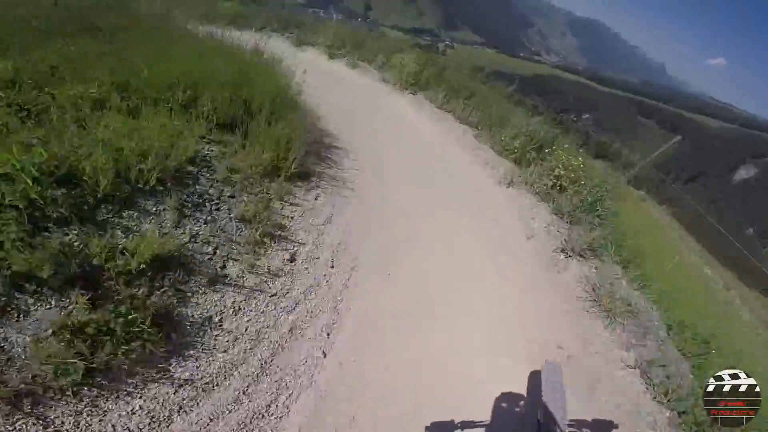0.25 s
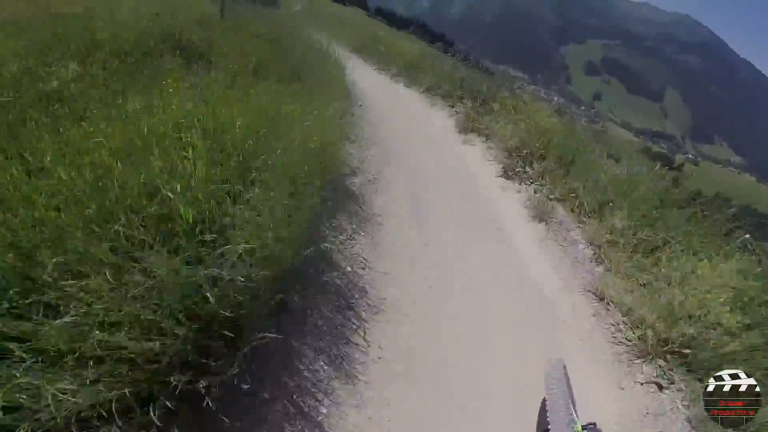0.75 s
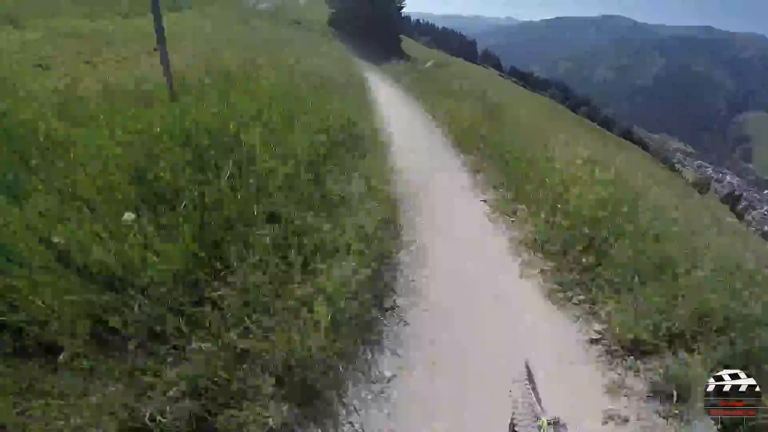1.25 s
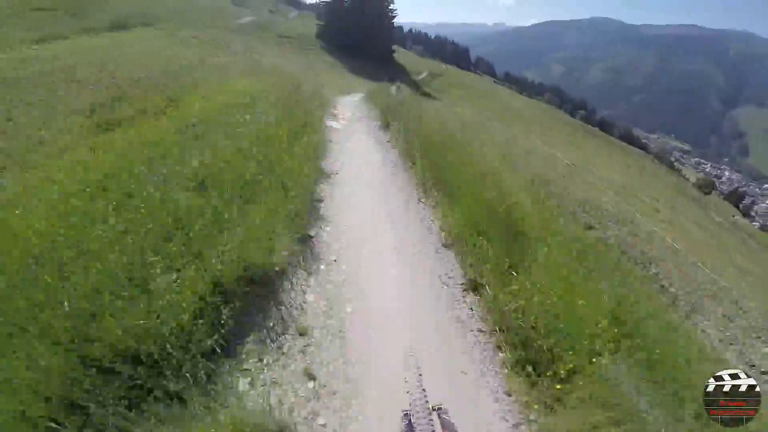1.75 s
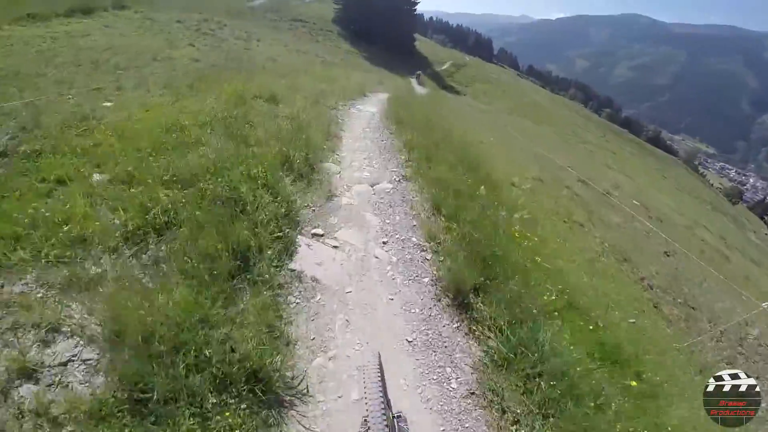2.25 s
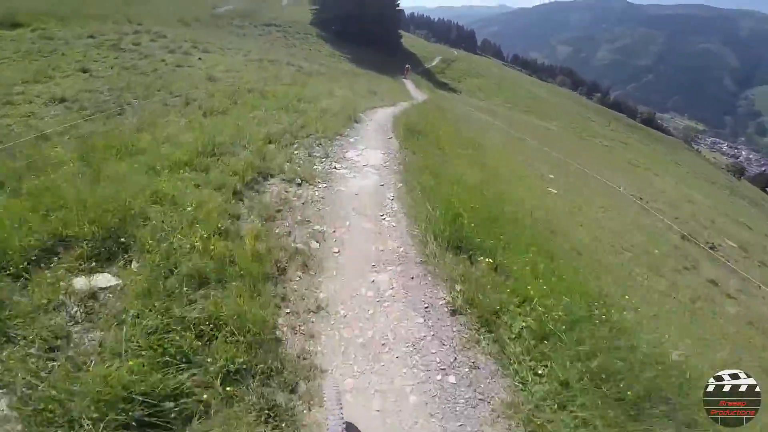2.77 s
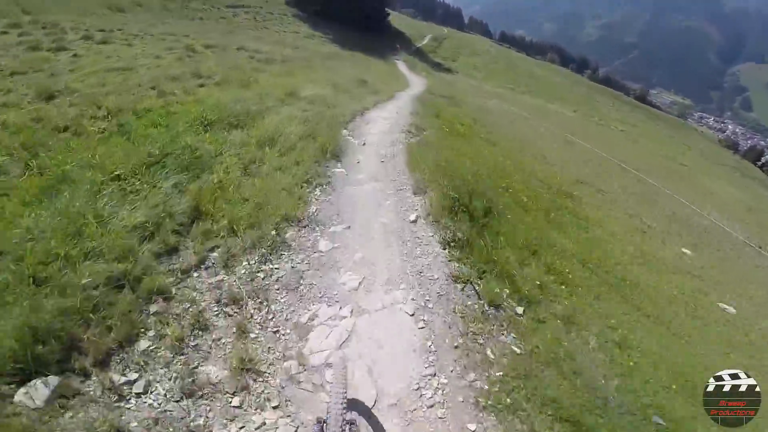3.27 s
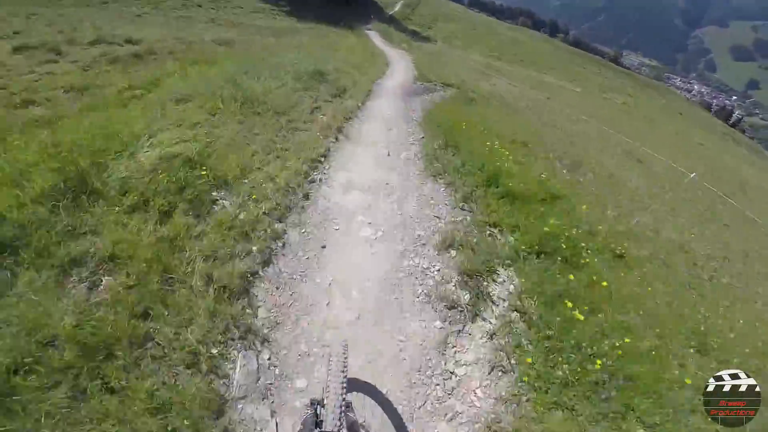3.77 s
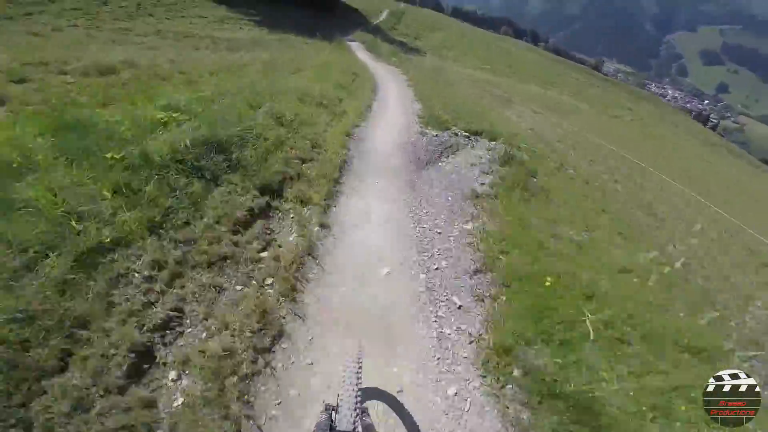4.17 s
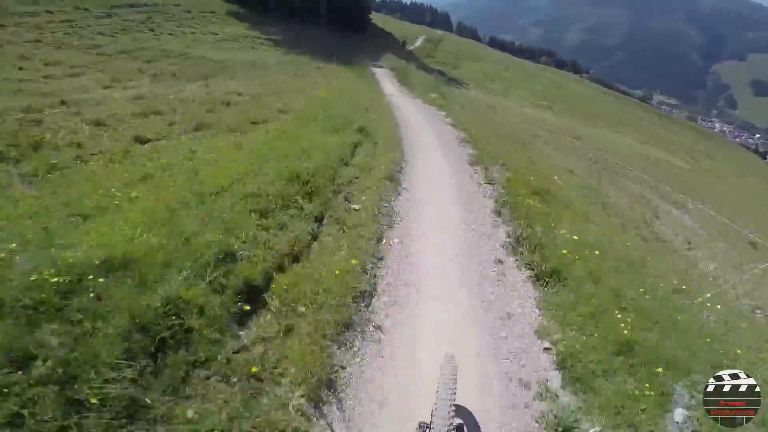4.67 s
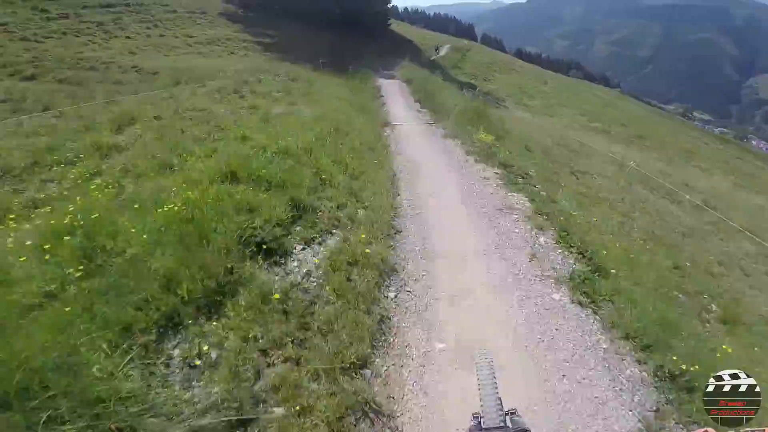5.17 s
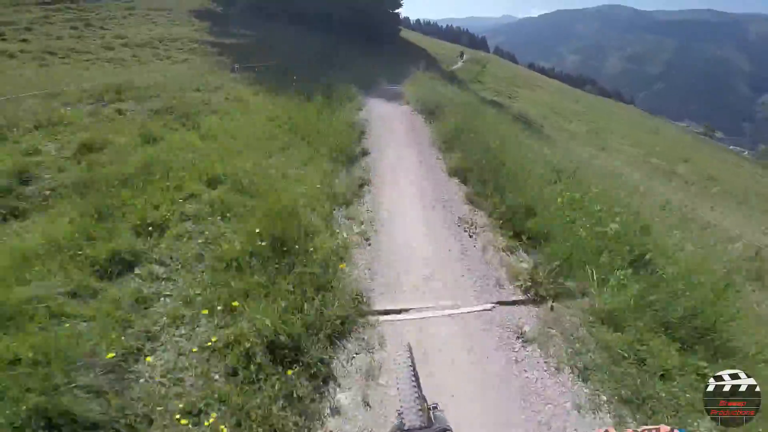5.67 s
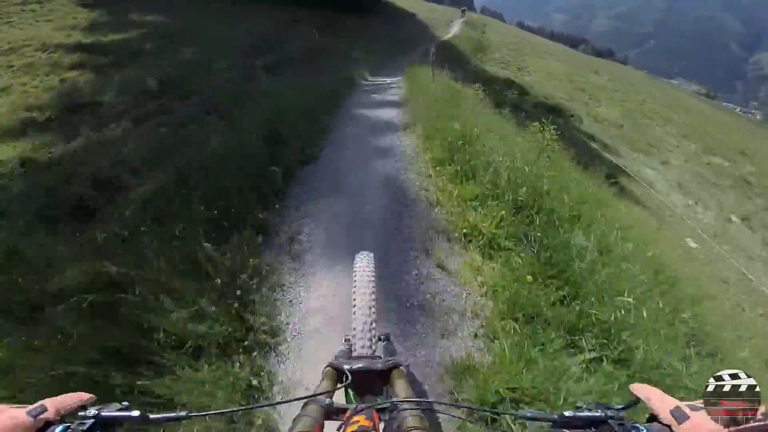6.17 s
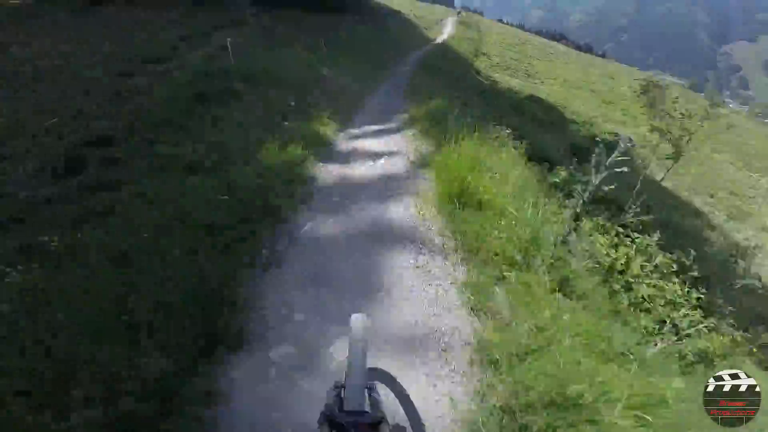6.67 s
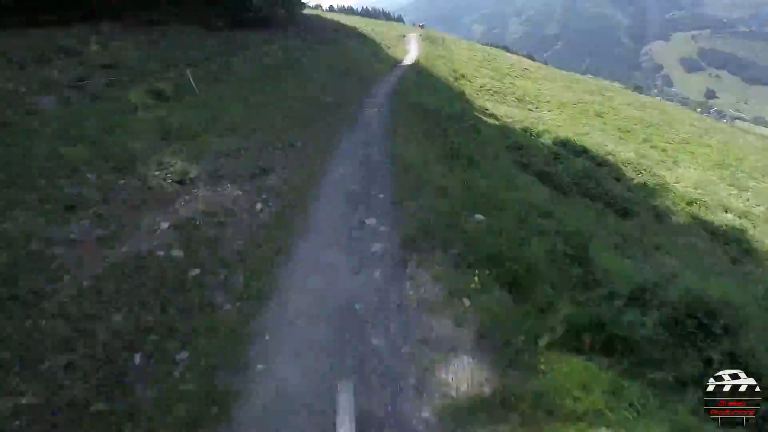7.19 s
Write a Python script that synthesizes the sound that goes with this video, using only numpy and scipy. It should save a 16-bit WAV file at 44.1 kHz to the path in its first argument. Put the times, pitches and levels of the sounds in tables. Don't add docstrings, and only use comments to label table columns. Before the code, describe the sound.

A coasting bike descends an open gravel hillside trail, heard through overloading wind on a close mono microphone. Deep uneven buffets come first, with rougher roaring gusts around one second, then a steadier low rumble and scattered bursts later. Beneath are faint crunching tyres, fast high freewheel ticks, sharp stone knocks, rattling chain slaps and barely audible brake disc chirps. There is no echo from the open slope.

```python
import sys
import numpy as np
from scipy import signal
from scipy.fft import rfft, irfft
from scipy.io import wavfile
from scipy.ndimage import uniform_filter1d

SR = 44100
rng = np.random.default_rng(int(sys.argv[2]) if len(sys.argv) > 2 else 0)


def volts_from_decibels(level):
    exponent = np.asarray(level, float) / 20
    return 10 ** exponent


def wrap_up_sound(samples):
    columns = np.atleast_2d(samples).T
    tamed = np.clip(columns, -1, 1)
    steps = np.round(tamed * 32767).astype(np.int16)
    wavfile.write(sys.argv[1], SR, steps)


N = 327645

# time in seconds, then the levels in dB of buffeting, flap, gust roar
WIND_LEVELS = [(0.0, -27.5, -44, -37, -45), (0.1, -34, -36, -54, -49), (0.16, -20, -25.5, -33, -55.5),
               (0.41, -17, -18, -21.5, -38.5), (0.48, -22, -29.5, -48.5, -48.5),
               (0.78, -17.5, -26, -28.5, -46), (1.14, -14, -22, -16.5, -24),
               (1.26, -20.5, -24.5, -35.5, -49), (1.3, -12, -28, -15.5, -27.5),
               (1.43, -21, -28, -36, -47.5), (1.66, -14.5, -26, -28.5, -45),
               (1.82, -29.5, -32.5, -50.5, -49), (2.19, -21.5, -33, -45.5, -62),
               (2.32, -29, -23.5, -19.5, -35.5), (2.38, -18, -29.5, -42.5, -51.5),
               (3.81, -20.5, -33.5, -41.5, -45), (3.91, -15.5, -14.5, -31.5, -51),
               (3.99, -18.5, -34, -42, -50), (4.26, -18, -27, -26, -46), (4.88, -15.5, -28, -39.5, -44.5),
               (5.05, -22, -35.5, -42, -48), (5.32, -13, -21, -31, -40.5), (5.63, -21.5, -32, -44.5, -51.5),
               (5.75, -11, -39, -25.5, -36), (5.79, -17, -26.5, -34.5, -37.5),
               (6.27, -26.5, -40, -49, -53.5), (6.45, -17.5, -35.5, -48, -55.5),
               (6.66, -12.5, -16, -24, -31), (6.75, -23, -50, -46, -46), (6.93, -26.5, -34, -43, -52),
               (7.06, -12, -20, -22, -39.5), (7.12, -28, -39, -43, -44), (7.24, -14, -21.5, -32, -39.5),
               (7.43, -22.5, -33, -39.5, -44)]
# frequency in Hz, level in dB per Hz.
BUFFET_COLOUR = [(7.1, -32), (12, -3.5), (34, 0.5), (110, -14), (140, -51), (240, -120)]
FLAP_COLOUR = [(60, -16), (90, 0), (130, -1.5), (200, -9.5), (300, -19), (500, -45)]
ROAR_COLOUR = [(120, -11), (210, -2), (300, -0.5), (450, -4.5), (700, -11), (1100, -27), (2000, -46)]
TEAR_COLOUR = [(400, -33), (700, -1.5), (1000, 2.5), (1400, -3.5), (2200, -13.5), (3500, -23), (6000, -52)]
# time in seconds, peak in dB, pitch in Hz.
PRESSURE_SPIKES = [(0.152, -20.5, 195), (0.243, -20.5, 231), (0.339, -18, 202), (0.405, -13, 195),
                   (0.57, -21.5, 269), (0.69, -17.5, 180), (0.743, -17, 200), (0.793, -18.5, 183),
                   (0.881, -22, 180), (1.125, -17, 291), (1.213, -17, 405), (1.294, -8, 364),
                   (1.314, -14, 380), (2.301, -15, 264), (2.633, -22, 225), (3.818, -33, 200),
                   (3.879, -23, 179), (3.914, -20, 180), (4.03, -21.5, 203), (4.184, -18, 287),
                   (4.5, -33, 226), (4.83, -22, 181), (5.282, -36, 185), (5.698, -25, 264),
                   (5.805, -27, 241), (5.817, -21, 180), (6.14, -42, 183), (6.533, -18.5, 188),
                   (7.074, -21, 255)]
# time in seconds, peak in dB, pitch in Hz,
# length in seconds.
EDDY_CHIRPS = [(0.342, -28.5, 800, 0.01), (0.406, -16.5, 597, 0.0076), (0.806, -23, 635, 0.0061),
               (0.952, -20, 850, 0.0074), (1.025, -18, 620, 0.0071), (1.113, -28, 703, 0.0096),
               (1.288, -33, 595, 0.0065), (1.293, -12.5, 816, 0.011), (1.35, -22, 760, 0.011),
               (1.452, -28.5, 610, 0.008), (1.548, -25, 660, 0.0077), (1.646, -21, 610, 0.0074),
               (1.68, -28.5, 850, 0.0064), (2.289, -17.5, 635, 0.0083), (2.326, -25, 713, 0.0067),
               (2.34, -30, 810, 0.008), (2.44, -35.5, 770, 0.009), (3.471, -36, 850, 0.0075),
               (3.814, -42, 840, 0.0075), (4.191, -28, 884, 0.0072), (4.288, -33, 614, 0.008),
               (4.355, -36, 630, 0.0082), (4.536, -32, 600, 0.007), (4.882, -38, 660, 0.0084),
               (5.991, -35, 830, 0.0083), (6.573, -22, 725, 0.0092), (6.592, -21.5, 620, 0.0056),
               (7.044, -34, 800, 0.008), (7.2, -32, 705, 0.0059), (7.296, -28, 690, 0.0062),
               (1.15, -27.5, 1180, 0.0076), (2.639, -28, 970, 0.0073), (4.204, -26.5, 1004, 0.009),
               (5.655, -35, 1284, 0.008), (5.736, -25.5, 988, 0.0053), (5.76, -22, 1060, 0.0072),
               (5.801, -35, 1120, 0.0081), (6.538, -26.5, 915, 0.0075), (6.667, -23.5, 910, 0.009),
               (6.677, -31, 1330, 0.011), (6.975, -19.5, 1093, 0.008), (6.988, -26, 1094, 0.0071),
               (3.634, -38, 760, 0.035)]
# time in seconds, roll level in dB, fine hiss level in dB.
TYRE_LEVELS = [(0.0, -54.5, -61.5), (1.18, -49, -58), (1.61, -53, -64), (3.31, -54.5, -69),
               (3.54, -51, -63), (5.71, -50.5, -63), (6.37, -55.5, -60), (6.97, -51.5, -70),
               (7.43, -44, -60)]
# frequency in Hz, level in dB per Hz.
ROLL_COLOUR = [(290, -26), (500, 3.5), (564, -11.5), (660, -10.5), (736, -5), (904, -8), (1050, -19.5),
               (1300, -7.5), (2410, -8), (9000, -31.5), (11700, -57), (19800, -120)]
HISS_COLOUR = [(3000, -2), (5000, 3), (7000, -1.5), (9000, -3.5), (12000, -1), (14500, -5.5), (15400, -3),
               (16500, -35)]
# time in seconds, level in dB, pawl drops per second.
FREEWHEEL_RATES = [(0.0, -64, 71), (0.25, -63.5, 65), (1.34, -62, 61.6), (1.8, -78, 59), (2.65, -68, 70),
                   (2.92, -67, 69.4), (3.89, -64, 67), (4.12, -63, 85.7), (5.17, -69, 110), (6.39, -61, 89),
                   (6.68, -62, 95), (7.43, -68, 93)]
# frequency in Hz, width in Hz, level in dB.
HUB_RINGS = [(13050, 660, 4), (12300, 900, -18), (14900, 900, -15), (10400, 2400, -10), (8500, 1200, -40),
             (5400, 400, -11)]
# time in seconds, peak in dB, pitch in Hz.
STONE_KNOCKS = [(0.9053, -41, 1680), (0.9877, -30.5, 1820), (1.014, -31.5, 1980), (1.0969, -47, 1740),
                (1.111, -37, 1700), (1.1656, -26.5, 2270), (1.2855, -43, 2100), (1.2955, -28, 1730),
                (1.5424, -39, 1700), (1.6826, -39, 1660), (1.7035, -42, 2100), (1.7956, -29, 2040),
                (2.8514, -38.5, 2320), (3.277, -43, 1850), (3.3323, -33, 1910), (3.4151, -38, 2200),
                (3.469, -31.5, 1970), (3.6636, -33, 2250), (3.896, -35, 2270), (3.9539, -36.5, 1770),
                (3.9594, -39, 2220), (4.8244, -36, 1940), (4.8584, -36.5, 2220), (4.884, -33.5, 1680),
                (5.2515, -36.5, 2240), (5.3308, -35, 2100), (6.0287, -34.5, 1920), (6.5271, -31.5, 1910),
                (6.538, -22, 1850), (6.6084, -31.5, 2700), (6.6657, -36, 2290), (6.7216, -37, 1800),
                (7.2215, -32, 1930), (1.31, -29, 2760), (1.32, -40, 2980)]
# time in seconds, peak in dB, top end against the middle in dB,
# ring in Hz.
CHAIN_SLAPS = [(0.9093, -44, -10, 5330), (0.9618, -40, -4.5, 5360), (1.075, -39.5, -13, 7600),
               (1.2979, -58, -14, 5240), (1.73, -40.5, -4.5, 5740), (1.8706, -41.5, -6, 5380),
               (2.0383, -48, -8, 6180), (2.1894, -46, -14, 7000), (2.3257, -46.5, -2.5, 5340),
               (2.6953, -41, -6, 6410), (3.3323, -59, -19, 5080), (3.3613, -45.5, -20, 5260),
               (3.4291, -39.5, -7, 5250), (3.48, -38, -14, 5100), (3.5397, -38, -22, 6900),
               (3.582, -39.5, -20, 5230), (3.6127, -38, -20, 5400), (3.6561, -44, -16, 6400),
               (3.712, -47, -13, 7900), (3.7389, -41, -17, 5880), (3.81, -41, -16, 5810),
               (3.879, -40, -18, 5220), (4.0866, -44, -13, 5690), (4.1662, -36.5, -12, 5100),
               (4.2436, -42, -12, 5200), (4.314, -39.5, -15, 5150), (5.969, -43, -13, 5350),
               (6.125, -42.5, -8, 6570), (6.5231, -41, -11, 5320), (6.5445, -28, -13, 5360),
               (6.5809, -35, -5, 5650), (6.608, -35, -11, 5940), (6.8064, -43.5, -4, 5240),
               (7.084, -47, -19, 5580), (7.1691, -41, -12, 5120), (7.3352, -44.5, -6, 5380)]
# time in seconds, peak in dB, pitch in Hz.
DISC_CHIRPS = [(2.5742, -48, 4830), (3.1718, -55, 4520), (3.3324, -51, 4610), (3.4292, -49, 5050),
               (3.4801, -44, 4970), (3.536, -47, 5040), (3.5819, -47, 4710), (3.8762, -52, 5600),
               (4.0862, -51, 4620), (4.1685, -49, 5200), (4.2429, -54, 5150), (4.361, -52, 5130),
               (5.999, -44, 4860), (6.2841, -50, 4710)]


def evened(x):
    return x / np.sqrt(np.mean(x ** 2) + 1e-20)


def curve(rows, column):
    columns = np.transpose(rows)
    return np.interp(np.arange(N) / SR, columns[0], columns[column])


def add(mix, start_s, sound):
    part = mix[round(start_s * SR):][:len(sound)]
    part += sound[:len(part)]


def flutter(speed_hz):
    hz = np.fft.rfftfreq(N, 1 / SR)
    spectrum = rfft(rng.standard_normal(N))
    return evened(irfft(spectrum / (1 + (hz / speed_hz) ** 2), N))


def noise(colour, patchy_db, size):
    hz = np.fft.rfftfreq(size, 1 / SR)
    real, imaginary, patches = rng.standard_normal((N // (size // 4) + 5, len(hz), 3)).T
    patches = uniform_filter1d(patches, size=5, axis=0)
    patches = evened(uniform_filter1d(patches, size=6, axis=1))
    colour_hz, db = np.transpose(colour)
    colour_db = np.interp(np.log(hz + 1), np.log(colour_hz + 1), db, -120, -120)
    spectra = (real + 1j * imaginary) * volts_from_decibels(colour_db[:, None] + patchy_db * patches)
    return evened(signal.istft(spectra, nperseg=size, noverlap=size - size // 4)[1][:N])


def resonate(x, hz, width):
    r = np.exp(-np.pi * width / SR)
    poles = [2, -4 * r * np.cos(2 * np.pi * hz / SR), 2 * r * r]
    return signal.lfilter([1 - r * r, 0, r * r - 1], poles, x)


def burst(t60, rise):
    t = np.arange(3000) / SR
    return (1 - np.exp(-t / rise)) * volts_from_decibels(-60 * t / t60)


def wind():
    clumps, shreds = flutter(34), flutter(150)
    buffet = noise(BUFFET_COLOUR, 0.73, size=4096)
    buffet /= np.sqrt(uniform_filter1d(buffet ** 2, size=5000) + 0.067)
    buffet = evened(buffet * volts_from_decibels(1.8 * clumps))
    flap = evened(noise(FLAP_COLOUR, 0.72, size=2048) * volts_from_decibels(3.25 * clumps))
    roar = evened(noise(ROAR_COLOUR, 1.7, size=1024) * volts_from_decibels(2.43 * clumps + 1.16 * shreds))
    tear = evened(noise(TEAR_COLOUR, 2.6, size=512) * volts_from_decibels(1.36 * clumps + 2.9 * shreds))
    out = volts_from_decibels(curve(WIND_LEVELS, 1)) * buffet
    out += volts_from_decibels(curve(WIND_LEVELS, 2) - 0.9) * flap
    out += volts_from_decibels(curve(WIND_LEVELS, 3) - 1.5) * roar
    out += volts_from_decibels(curve(WIND_LEVELS, 4) - 3.0) * tear
    return out


def thumps():
    out = np.zeros(N)
    for s, db, hz in PRESSURE_SPIKES:
        u = (np.arange(600) / SR - 0.006) * np.pi * hz * 0.9
        push = (1 - 2 * u ** 2) * np.exp(-u ** 2)
        add(out, s - 0.003, volts_from_decibels(db + 4.0) * push)
    return out


def eddies():
    out = np.zeros(N)
    for (s, db, hz, length), phase in zip(EDDY_CHIRPS, rng.random(len(EDDY_CHIRPS))):
        u = np.linspace(0, 1, int(length * SR))
        rise = 0.35 * min(0.01 / length, 1) ** 2
        cycles = np.cumsum(hz * (1 + rise * (u - 0.5))) / SR
        whistle = np.sin(2 * np.pi * (cycles + phase)) * signal.windows.tukey(len(u), 0.7)
        add(out, s - 0.002, volts_from_decibels(db + 0.5) * whistle)
    return out


def tyres():
    shake = flutter(30)
    crunches = rng.random(N) < 300 / SR
    grit = volts_from_decibels(1.3 * np.minimum(rng.exponential(1, N), 5)) * crunches
    grit = evened(signal.lfilter([1], [1, -0.985], grit))
    roll = noise(ROLL_COLOUR, 1.24, size=512) * volts_from_decibels(1.16 * shake) * (1 + 0.37 * grit)
    hiss = noise(HISS_COLOUR, 3.1, size=256) * volts_from_decibels(1.3 * shake) * (1 + 0.23 * grit)
    out = volts_from_decibels(curve(TYRE_LEVELS, 1) + 2.5) * evened(roll)
    return out + volts_from_decibels(curve(TYRE_LEVELS, 2) - 2.5) * evened(hiss)


def freewheel():
    rate = curve(FREEWHEEL_RATES, 2) * (1 + 0.0537 * flutter(29))
    teeth = np.cumsum(rate) / SR
    strength = volts_from_decibels(2.2 * rng.standard_normal(1000))[teeth.astype(int)]
    place = teeth % 1
    drops = strength * (place * np.exp(-place / 0.18) + 0.0096) * rng.standard_normal(N)
    shell = sum(volts_from_decibels(db) * resonate(drops, hz, width) for hz, width, db in HUB_RINGS)
    return volts_from_decibels(curve(FREEWHEEL_RATES, 1) + 3.0) * evened(shell)


def knocks():
    out = np.zeros(N)
    scratches = rng.standard_normal((len(STONE_KNOCKS), 3000))
    for (s, db, hz), scratch in zip(STONE_KNOCKS, scratches):
        ring = evened(resonate(resonate(scratch, hz, 790), hz, 970))
        ring += 0.27 * evened(resonate(resonate(scratch, 1.25 * hz, 1360), 1.4 * hz, 2200))
        add(out, s - 0.002, volts_from_decibels(db + 6.5) * ring * burst(0.036, rise=0.007))
    return out


def slaps():
    out = np.zeros(N)
    spits = rng.standard_normal((len(CHAIN_SLAPS), 3000))
    for (s, db, top_db, hz), spit in zip(CHAIN_SLAPS, spits):
        middle = evened(resonate(resonate(spit, hz, 2150), hz, 4500))
        middle += 0.75 * evened(resonate(spit, 5900, 5000))
        top = evened(resonate(resonate(spit, 10570, 4200), 11900, 5500))
        clack = middle + volts_from_decibels(top_db + 9.0) * top
        add(out, s - 0.002, volts_from_decibels(db + 3.0) * clack * burst(0.026, rise=0.0078))
    return out


def disc():
    out = np.zeros(N)
    rubs = rng.standard_normal((len(DISC_CHIRPS), 3000))
    for (s, db, hz), rub in zip(DISC_CHIRPS, rubs):
        ring = evened(resonate(resonate(rub, hz, 150), hz, 300))
        add(out, s - 0.002, volts_from_decibels(db - 2.5) * ring * burst(0.063, rise=0.0046))
    return out


def scene():
    at_port = wind() + thumps() + eddies()
    bike = tyres() + freewheel() + knocks() + slaps() + disc()
    return (at_port + bike)[None]


def low_pass(x):
    return signal.sosfilt(signal.butter(12, 15680, fs=SR, output="sos"), x)


def record(dry):
    rounded = 0.82 * np.tanh(dry / 0.79)
    band_limit = signal.firwin(255, 15250, window=("kaiser", 9), fs=SR)
    mix = signal.oaconvolve(rounded, band_limit[None], "same")
    return low_pass(mix)


dry = scene()
out = record(dry)
wrap_up_sound(out)
```